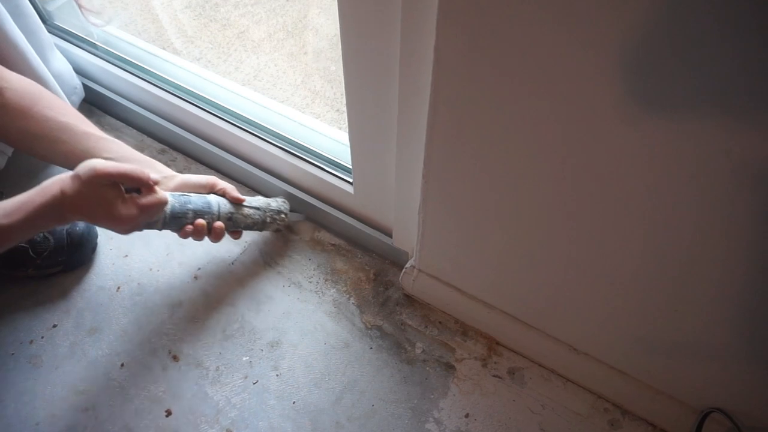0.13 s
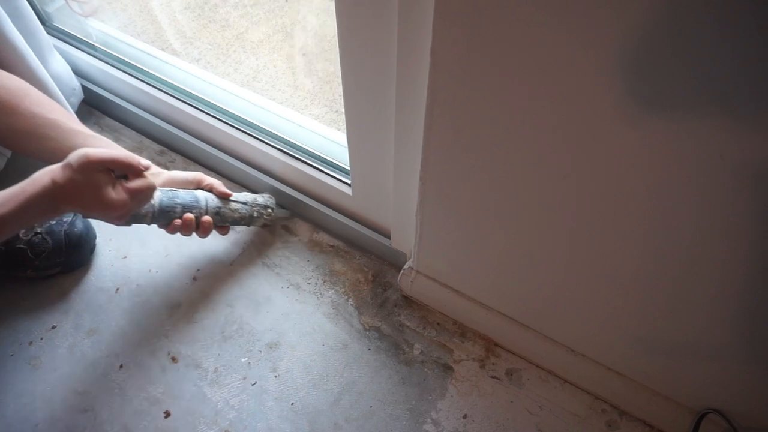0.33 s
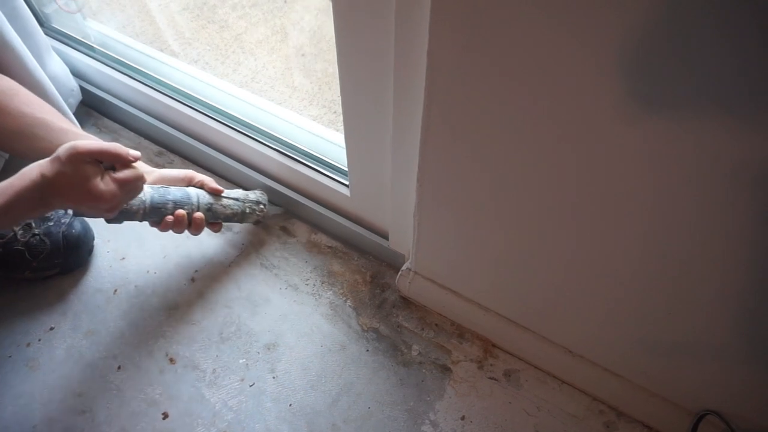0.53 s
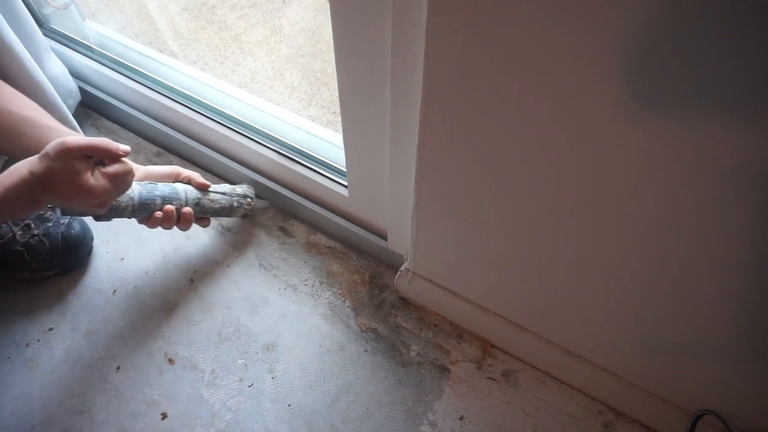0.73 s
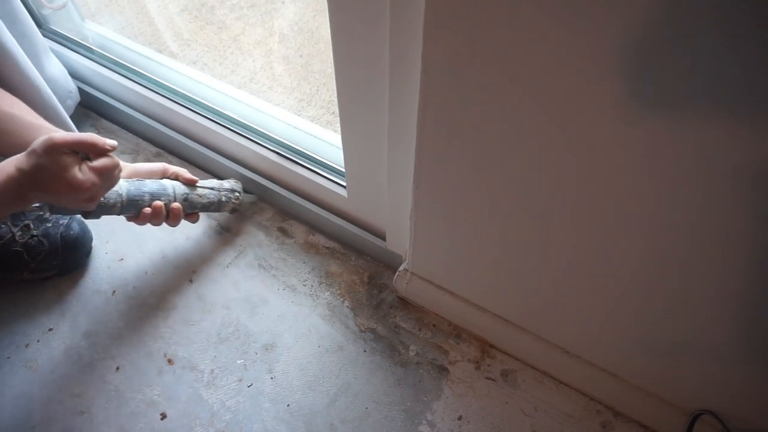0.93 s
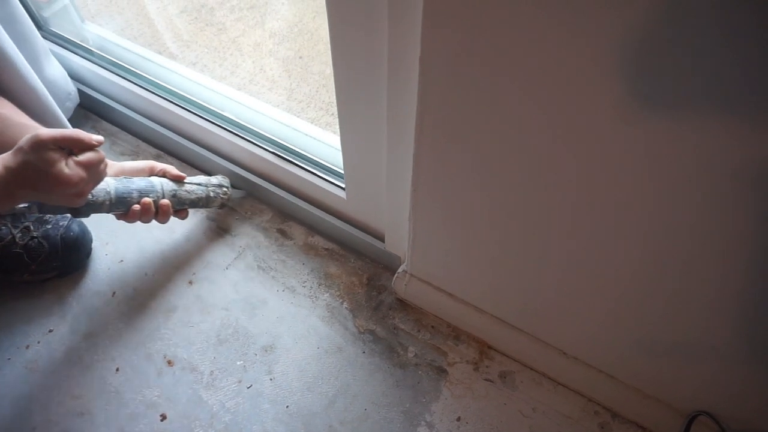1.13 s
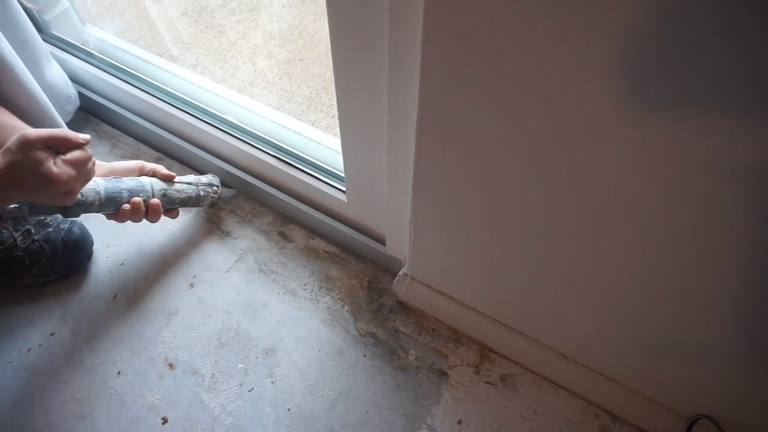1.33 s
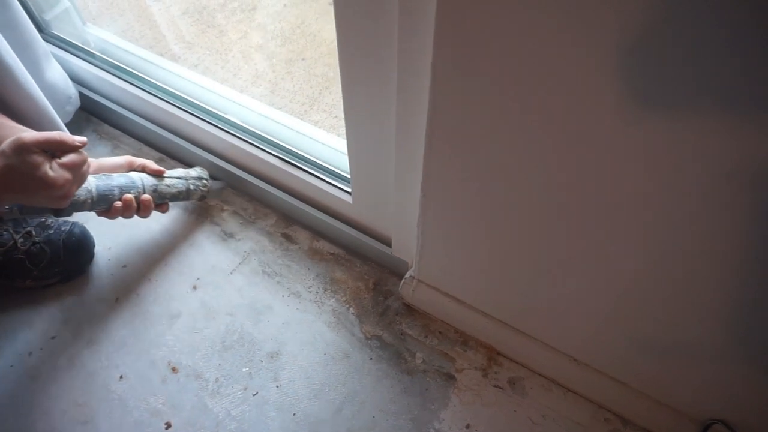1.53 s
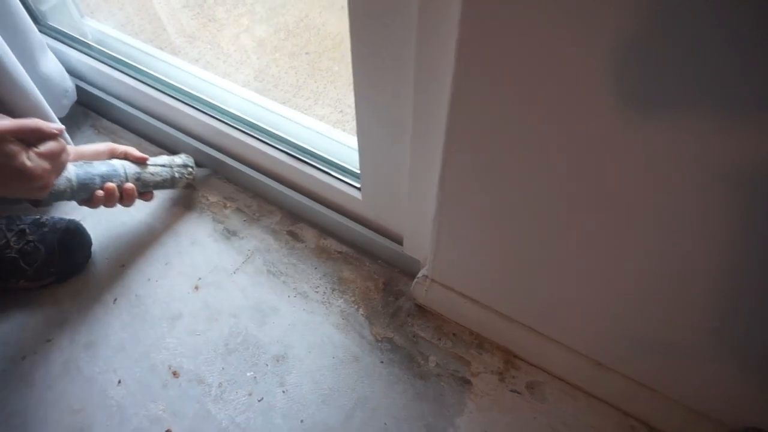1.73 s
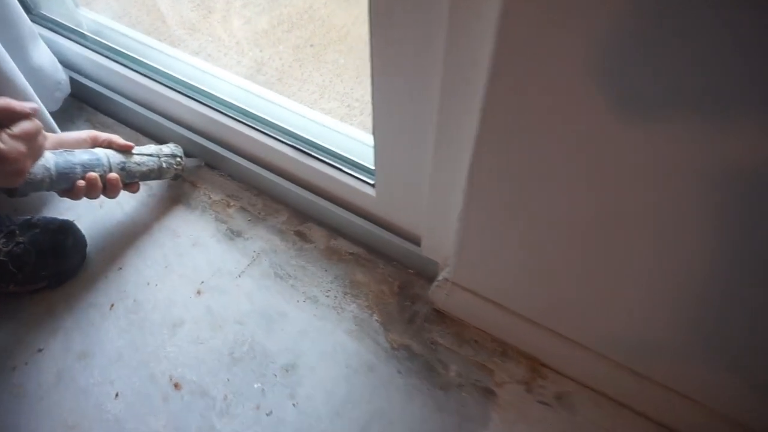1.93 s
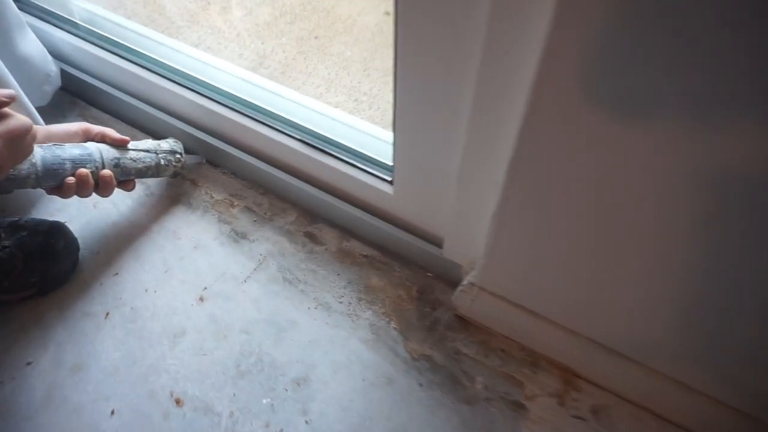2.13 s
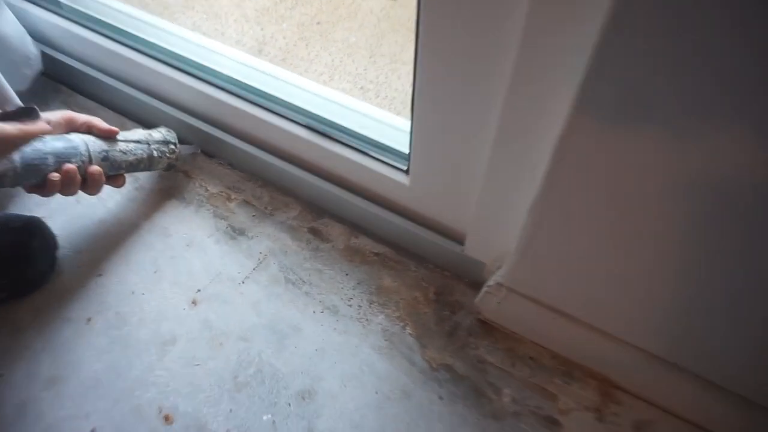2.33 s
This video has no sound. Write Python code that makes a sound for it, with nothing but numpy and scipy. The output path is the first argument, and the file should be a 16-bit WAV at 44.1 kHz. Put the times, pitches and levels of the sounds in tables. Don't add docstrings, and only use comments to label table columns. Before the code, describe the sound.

A manual caulking gun knocks, scrapes and clicks along a concrete edge, then releases with a metallic clatter.

```python
import sys
import numpy as np
from scipy import signal
from scipy.fft import rfft, irfft, next_fast_len
from scipy.io import wavfile
from scipy.ndimage import uniform_filter1d, map_coordinates

SR = 44100
rng = np.random.default_rng(int(sys.argv[2]) if len(sys.argv) > 2 else 0)


def level_to_linear(level):
    exponent = np.asarray(level, float) / 20
    return 10 ** exponent


def master(y):
    cut = np.clip(np.atleast_2d(y).T, -1, 1)
    pcm = np.round(cut * 32767)
    wavfile.write(sys.argv[1], SR, pcm.astype(np.int16))


N = 104869


def unit(x):
    return x / np.sqrt(np.mean(x ** 2) + 1e-20)


def along(points, hz):
    f, value = np.transpose(points)
    return np.interp(np.log(hz + 1), np.log(f + 1), value)


def wobble(rate):
    knots = rng.standard_normal(int(N * 200 / SR) + 9)
    return map_coordinates(knots, [np.arange(N) * min(rate, 199) / SR])


def filtered(x, response):
    n = x.shape[-1]
    m = next_fast_len(n + 2048)
    return irfft(rfft(x, m) * response(np.fft.rfftfreq(m, 1 / SR)), m)[..., :n]


def resonance(hz, width):
    return lambda f: 1j * f * width / (hz * hz - f * f + 1j * f * width)


def add(track, s, sound):
    part = track[max(round(s * SR), 0):][:len(sound)]
    part += sound[:len(part)]


# f/Hz, correlation/1
LIKENESS = [(100, 0.89), (600, 0.58), (2000, 0.17), (8000, 0.32)]


def rush(spectrum, patchy_db):
    z = signal.stft(rng.standard_normal((2, N)), nperseg=256)[2]
    field = uniform_filter1d(rng.standard_normal(z.shape[1:]), size=4, axis=0)
    field = uniform_filter1d(field, size=6, axis=1)
    pair = signal.istft(z * level_to_linear(patchy_db * unit(field)), nperseg=256)[1][:, :N]

    def mid_side(hz):
        turn = np.arccos(np.clip(along(LIKENESS, hz), -1, 1)) / 2
        return level_to_linear(along(spectrum, hz)) * [np.cos(turn), np.sin(turn)]

    mid, side = filtered(pair, mid_side)
    return unit(np.array([mid + side, mid - side]))


def blow(hz, cycles, rough, spread):
    rise_cycles = 1.085
    t = np.arange(SR // 10) / SR
    tone = np.sin(2 * np.pi * hz * t) + 0.39 * np.sin(2 * np.pi * hz * (1 + spread) * t)
    band = resonance(hz * (1 + spread), (.3 + abs(spread)) * hz)
    noise = unit(filtered(rng.standard_normal(len(t)), lambda f: band(f) ** 2))
    decay = level_to_linear(-60 * t * hz / cycles)
    return (tone + rough * noise) * decay * (1 - np.exp(-(t * hz / rise_cycles) ** 2))


def crack(hz, t60):
    rise_s, colour_db = .00025, 4
    t = np.arange(SR // 10) / SR
    burst = rng.standard_normal(len(t)) * level_to_linear(-60 * t / t60) * (1 - np.exp(-t / rise_s))
    bright, colour = resonance(4200, 9000), resonance(hz, .2 * hz)
    burst = filtered(burst, lambda f: bright(f) ** 2 + level_to_linear(colour_db) * colour(f))
    return 8 * burst / np.linalg.norm(burst)


def ring(modes):
    chatter_db, rise_s = 4.5, 0.0009
    t = np.arange(SR // 2) / SR
    total = np.zeros(len(t))
    for hz, db, t60 in modes:
        chatter = level_to_linear(chatter_db * map_coordinates(rng.standard_normal(80), [t * 120]))
        total += chatter * level_to_linear(db - 60 * t / t60) * np.sin(2 * np.pi * (hz * t + rng.random()))
    return total * (1 - np.exp(-t / rise_s))


def building():
    hum = level_to_linear(-67) * np.sin(2 * np.pi * 60 * np.arange(N) / SR)
    return hum + level_to_linear(-60) * rush([(20, -4), (50, -7.0), (200, -44), (400, -120)], patchy_db=-3)


# f/Hz, t60/s
ROOM_DECAY = [(500, 0.16), (2000, 0.47), (10000, 0.33)]


def room(x):
    hz, t, z = signal.stft(rng.standard_normal((2, SR // 2)), SR, nperseg=256)
    decay = level_to_linear(-60 * t / along(ROOM_DECAY, hz)[:, None])
    tail = signal.istft(z * decay, SR, nperseg=256)[1]
    late = np.pad(x, (130, 0))[None]
    return signal.fftconvolve(late, tail / np.linalg.norm(tail[0]), axes=1)[:, :N]


# f/Hz, width/Hz, level/dB
CARTRIDGE = [(406, 112, -2.5), (1100, 990, 5.5), (2540, 940, -0.5), (3970, 740, -7), (7260, 1800, -5)]


def body(f):
    return 1 + sum(level_to_linear(db) * abs(resonance(hz, width)(f)) ** 2 for hz, width, db in CARTRIDGE)


# t/s, rub level/dB, grit level/dB
DRAG_LEVELS = [(0, -43, -51.5), (.12, -53.5, -58.5), (.2, -43, -52), (.33, -41, -47), (.52, -47.5, -56.5),
               (.7, -44.5, -56), (.88, -42.5, -50), (1.06, -45.5, -50.5), (1.3, -44, -57),
               (1.443, -58, -58.5), (1.453, -41.5, -44), (1.741, -44, -46), (1.76, -37, -37.5),
               (1.93, -36, -42), (2.031, -47.5, -42.5), (2.19, -52.5, -38.5), (2.24, -54, -45),
               (2.38, -81, -48)]
# f/Hz, level/dB per Hz
RUB_COLOUR = [(24, -67), (40, -30.5), (280, -12), (338, -7.5), (371, -10), (549, -6), (3500, -24),
              (4550, -26), (7700, -120)]
# f/Hz, level/dB per Hz
HISS_COLOUR = [(880, -11), (1500, -10), (2460, -7), (10600, -15.5), (11200, -19), (11500, -39),
               (15000, -67), (22000, -120)]


def drag():
    s, rub_db, grit_db = np.transpose(DRAG_LEVELS)
    t = np.arange(N) / SR
    pressure = .8 * wobble(14)
    rub = level_to_linear(pressure + 1.7 * wobble(90)) * filtered(rush(RUB_COLOUR, patchy_db=2.5), body)
    hiss = level_to_linear(pressure + 0.72 * wobble(120)) * filtered(rush(HISS_COLOUR, patchy_db=2.5), body)
    return unit(rub) * level_to_linear(np.interp(t, s, rub_db)) + unit(hiss) * level_to_linear(np.interp(t, s, grit_db))


# t/s, level/dB, colour f/Hz
GRIT_TICKS = [(0.0326, -41, 2980), (0.1516, -23, 2740), (0.2320, -29.5, 3000), (0.267, -20, 4450),
              (0.2700, -33, 5200), (0.3728, -28.5, 5340), (0.5762, -40.5, 3000), (0.5882, -40.5, 3000),
              (0.6448, -37, 4000), (0.65, -38, 5960), (0.8125, -34, 6500), (0.8178, -25.5, 6460),
              (0.8558, -27.5, 7300), (0.8702, -21, 3870), (1.0254, -37, 2500), (1.1, -33.5, 3000),
              (1.1102, -36, 3020), (1.239, -39, 3000), (1.3145, -41, 5860), (1.4488, -27.5, 3820),
              (1.4559, -28, 3850), (1.477, -42, 3000), (1.483, -32, 3500), (1.7540, -25, 4200),
              (1.7915, -29, 2500), (1.8097, -26, 4500), (1.8750, -25.5, 3300), (1.8923, -28, 3400),
              (1.9075, -28, 2030), (2.2025, -30, 1810), (2.2060, -29, 2200)]


def ticks():
    x = np.zeros(N)
    for s, db, hz in GRIT_TICKS:
        add(x, s - .0006, level_to_linear(db - 8) * crack(hz, t60=0.024))
    return filtered(x, body)


# t/s, level/dB, f/Hz
CARTRIDGE_KNOCKS = [(0.036, -29, 405), (0.153, -27.5, 413), (0.324, -34, 406), (0.3706, -26, 444),
                    (0.3783, -32, 439), (0.4225, -30.5, 580), (0.414, -31, 612), (0.5761, -25.5, 1115),
                    (0.692, -36, 540), (0.772, -29.5, 412), (0.817, -33, 400), (0.8195, -30, 990),
                    (0.8569, -21.5, 1065), (1.024, -33.5, 880), (1.132, -31.5, 557), (1.159, -31.5, 786),
                    (1.194, -37, 846), (1.246, -21, 907), (1.262, -31.5, 986), (1.294, -30, 815),
                    (1.31, -31, 940), (1.4565, -25.5, 780), (1.4775, -16.5, 985), (1.487, -27.5, 950),
                    (1.523, -28, 894), (1.7543, -15, 1020), (1.763, -16.5, 1235), (1.7925, -23.5, 770),
                    (1.807, -29, 895), (1.837, -33, 795), (1.8757, -9.5, 1087), (1.891, -20.5, 1040),
                    (1.909, -19.5, 1150), (1.922, -25, 1075), (1.935, -37, 900), (2.112, -27.5, 1110),
                    (2.263, -32.5, 389)]
# t/s, level/dB, f/Hz
SLAB_THUD = (1.905, -33, 253)


def knocks():
    tube_hz = 750
    x = np.zeros(N)
    for s, db, hz in CARTRIDGE_KNOCKS:
        spread = np.sqrt(tube_hz / hz) - 1
        add(x, s - .001, level_to_linear(db - 1.0) * blow(hz, cycles=22.1, rough=0.42, spread=spread))
    s, db, hz = SLAB_THUD
    add(x, s, level_to_linear(db) * blow(hz, cycles=26, rough=1.3, spread=0.29))
    return x


# t/s, length/s, start f/Hz, end f/Hz, level/dB
ROD_SLIPS = [(0.182, 0.017, 2670, 2890, -39.5), (0.214, 0.0087, 2750, 2800, -44),
             (0.297, .035, 3050, 3050, -40), (0.407, 0.027, 3110, 3130, -44),
             (.290, 0.037, 1812, 1770, -29.5), (0.405, 0.026, 2544, 2040, -36),
             (0.407, 0.026, 1770, 1790, -35.5), (0.453, .05, 1900, 1886, -39.5),
             (0.526, 0.023, 1805, 1774, -39.5), (1.481, 0.045, 2450, 2540, -40),
             (1.773, 0.045, 2580, 2640, -40.5), (1.83, .04, 2750, 2690, -40),
             (1.834, 0.045, 1837, 1907, -38), (1.878, .06, 2400, 2370, -38.5)]


def creak():
    scatter_hz, grain_hz, grain_share = 35, 350, .9
    x = np.zeros(N)
    for s, length, from_hz, to_hz, db in ROD_SLIPS:
        u = np.linspace(0, 1, round(length * SR))
        pitch = from_hz + (to_hz - from_hz) * u + scatter_hz * wobble(194)[:len(u)]
        tone = np.sin(2 * np.pi * np.cumsum(pitch) / SR)
        grains = unit(filtered(rng.standard_normal(SR // 10), lambda f: f < grain_hz))[:len(u)]
        swell = np.sqrt(np.sin(np.pi * u).clip(0))
        add(x, s, level_to_linear(db - 5.5) * (1 + grain_share * grains) * swell * tone)
    return x


# multiple/1, level/dB
SQUEAK_HARMONICS = [(2, -0.5), (3, -9), (5, -21), (6, -23)]


def squeak():
    start_s, length_s, pitch_hz, sag, level_db = .3715, 0.03, 891, 0.034, -25.5
    x = np.zeros(N)
    u = np.linspace(0, 1, round(length_s * SR))
    turns = np.cumsum(pitch_hz * (1 - sag * u)) / SR
    shape = np.clip(np.minimum(u, 1 - u) * 10, 0, 1) * level_to_linear(-4 * u + 1.2 * wobble(190)[:len(u)])
    tone = sum(level_to_linear(db) * np.sin(2 * np.pi * round(k) * turns) for k, db in SQUEAK_HARMONICS)
    add(x, start_s, level_to_linear(level_db) * shape * tone)
    return x


# t/s, level/dB, f/Hz, ring level/dB
TRIGGER_CLICKS = [(0.0352, -34, 3040, -19), (0.1514, -27, 2550, -26), (0.1537, -22, 2680, -34),
                  (0.1595, -24, 2650, -35), (0.236, -31, 2620, -39), (0.2681, -12, 1784, -32),
                  (0.2710, -13.5, 2540, -44), (0.273, -20, 3100, -42), (0.4381, -13.5, 1830, -17.5),
                  (0.444, -21, 1850, -25), (0.4478, -23, 1910, -34), (0.819, -26.5, 2720, -39),
                  (0.872, -22.5, 2490, -35), (0.886, -25.5, 2830, -34), (1.449, -31, 2640, -35),
                  (1.4565, -23, 2450, -21), (1.466, -29, 2530, -28), (1.7560, -29.5, 2700, -7.5),
                  (2.1126, -25.5, 2300, -22)]
# f/Hz, level/dB, t60/s
ROD_MODES = [(1770, -5.5, 0.17), (1896, -5, 0.14), (2300, -22.5, 0.31), (2620, -3, 0.05)]


def trigger():
    x = np.zeros(N)
    for s, db, hz, ring_db in TRIGGER_CLICKS:
        add(x, s - .001, level_to_linear(db - 5.5) * blow(hz, cycles=50.5, rough=0.44, spread=0.089))
        add(x, s, level_to_linear(db + ring_db) * ring(ROD_MODES))
    return x


# t/s, clank level/dB, clank f/Hz, crack level/dB, crack colour f/Hz
FRAME_CONTACTS = [(2.2086, -8, 1850, -25, 2700), (2.2108, -12, 1800, -21, 6600),
                  (2.2150, -13, 2600, -26, 3450), (2.2163, -5, 1880, -26, 4300),
                  (2.2213, -6, 2230, -10, 4280), (2.2250, -12, 2350, -12, 5300),
                  (2.2310, -15, 2100, -17, 7700), (2.2392, -16, 2300, -9, 7600),
                  (2.2445, -14, 2200, -16, 5500), (2.2482, -10, 2150, -15, 5200),
                  (2.2575, -20, 1660, -24, 4000), (2.2635, -15, 1660, -24, 7800)]
# f/Hz, level/dB, t60/s
FRAME_MODES = [(1490, -0.5, 0.04), (1861, 4, 0.05), (1945, -6, 0.08), (2253, 0, 0.074), (2352, -2.5, 0.1),
               (2695, -3, 0.05), (4010, -7.5, 0.09), (3050, -16, 0.065), (5280, -11, 0.14),
               (6600, -22, 0.067), (7430, -11, 0.2), (7900, -14, 0.2)]
# t/s, level/dB, f/Hz
HANDLE_THUMPS = [
    (2.209, -14.5, 818),
    (2.2095, -16.5, 492),
    (2.214, -19.5, 1054),
    (2.224, -26, 850),
]
# f/Hz, level/dB, t60/s
SPRING_MODES = [(1655, 3, 0.35), (1675, -3, 0.4), (1879, -6, 0.16), (2137, -8, .13), (2356, -6, 0.35),
                (2417, -9, .4), (2260, -7, 0.4), (2546, -12, 0.24), (3052, -16, .2)]


def release():
    x = np.zeros(N)
    for s, db, hz, crack_db, crack_hz in FRAME_CONTACTS:
        add(x, s - .0007, level_to_linear(db + 1.0) * blow(hz, cycles=32, rough=.3, spread=0.208))
        add(x, s - .0003, level_to_linear(crack_db - 1.5) * crack(crack_hz, t60=.02))
        add(x, s, level_to_linear(db - 19.5) * ring(FRAME_MODES))
    for s, db, hz in HANDLE_THUMPS:
        add(x, s, level_to_linear(db) * blow(hz, cycles=20, rough=0.36, spread=0.11))
    add(x, 2.249, level_to_linear(-30) * ring(SPRING_MODES))
    return x


def scene():
    lead_s, room_db = 2e-5, -7.5
    parts = [knocks() + ticks(), trigger() + squeak() + creak(), release()]
    lean_db = [.5, 3, 1.2]
    side = np.array([[1], [-1]])
    near = sum(part * level_to_linear(db * side) for part, db in zip(parts, lean_db))
    near = filtered(near, lambda f: np.exp(1j * np.pi * f * lead_s * side))
    walls = level_to_linear(room_db) * sum(room(part) for part in parts)
    return near + walls + drag() * level_to_linear(.5 * side) + building()


def band_limit(x):
    return signal.sosfilt(signal.butter(12, 15720, fs=SR, output="sos"), x)


def record(dry):
    edge_hz, edge_width_hz, leak_hz, bass_hz = 11166, 110, 13800, 150
    held = dry / (1 + abs(dry) ** 4) ** (1 / 4)

    def response(f):
        leak = level_to_linear(-20) * np.exp(-((f - leak_hz) / 1000) ** 4)
        skirt = level_to_linear(-32 - 0.033 * abs(f - edge_hz))
        passed = 1 / (1 + np.exp(np.clip((f - edge_hz) / edge_width_hz, -50, 50)))
        return (leak + skirt + passed) * (1j * f / (1j * f + bass_hz)) ** 2

    return band_limit(filtered(held, response))


dry = scene()
out = record(dry)
master(out)
```